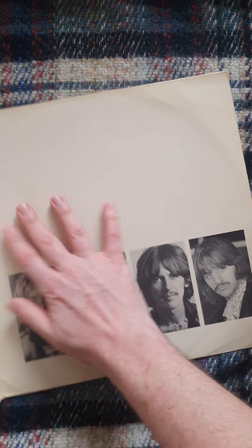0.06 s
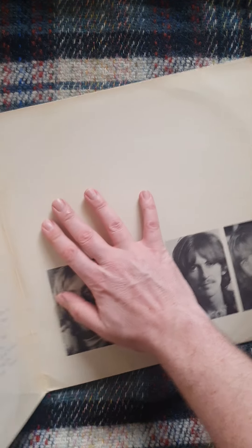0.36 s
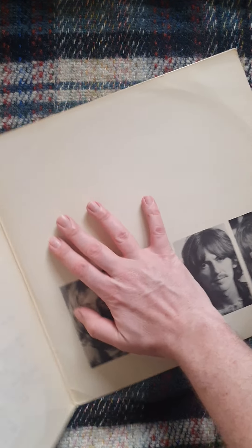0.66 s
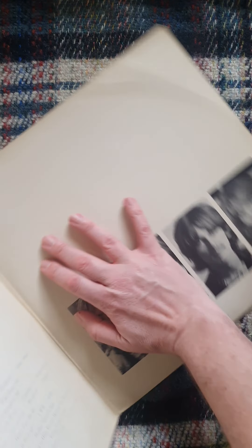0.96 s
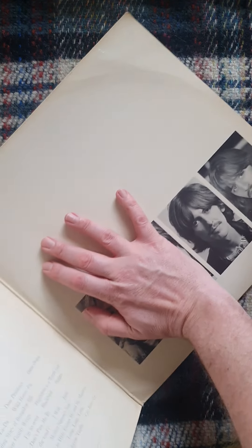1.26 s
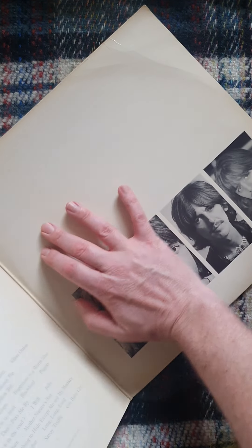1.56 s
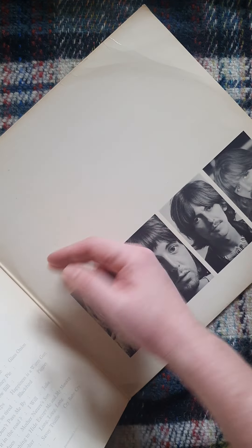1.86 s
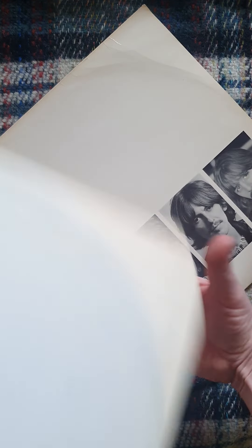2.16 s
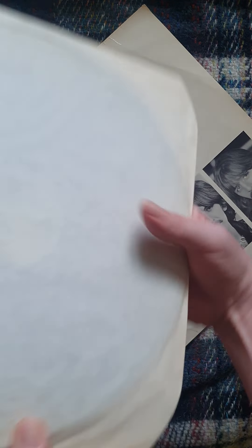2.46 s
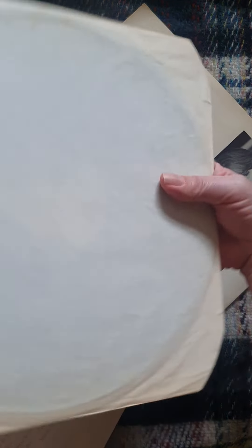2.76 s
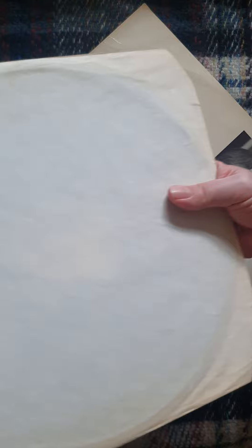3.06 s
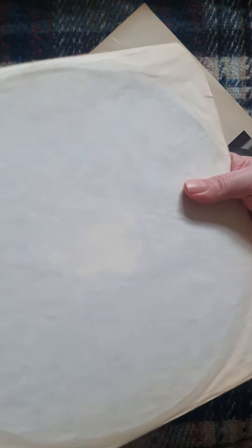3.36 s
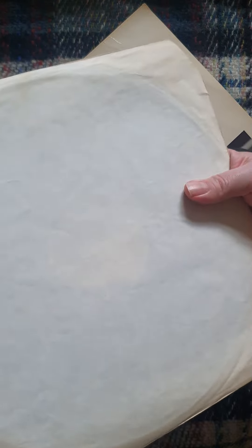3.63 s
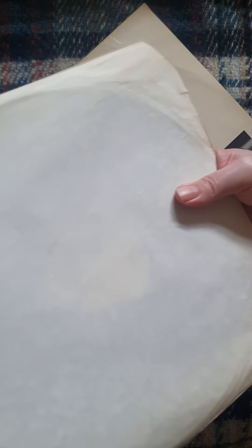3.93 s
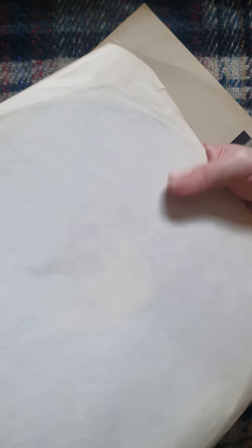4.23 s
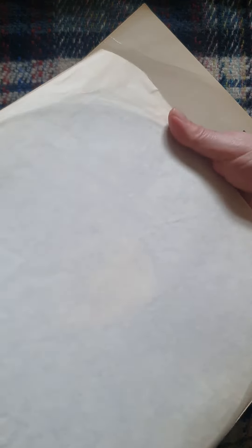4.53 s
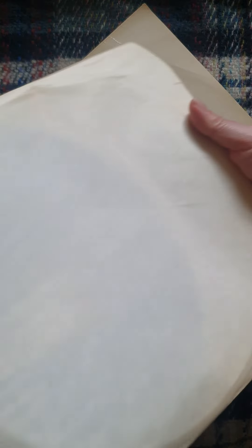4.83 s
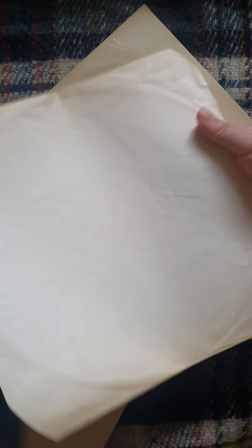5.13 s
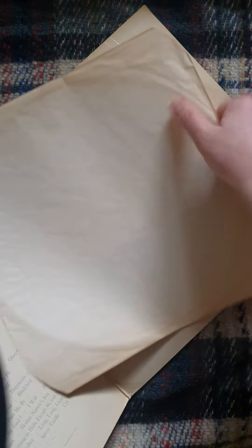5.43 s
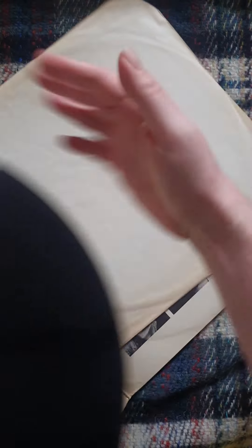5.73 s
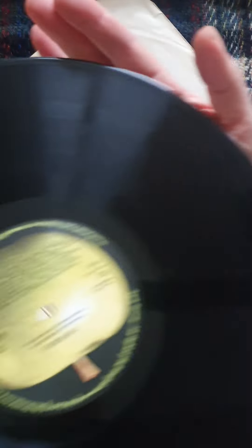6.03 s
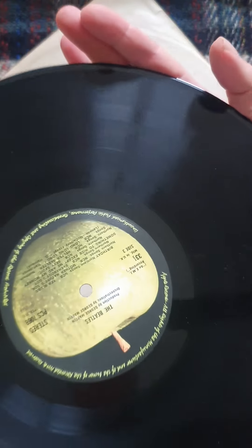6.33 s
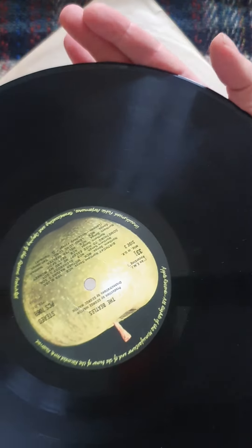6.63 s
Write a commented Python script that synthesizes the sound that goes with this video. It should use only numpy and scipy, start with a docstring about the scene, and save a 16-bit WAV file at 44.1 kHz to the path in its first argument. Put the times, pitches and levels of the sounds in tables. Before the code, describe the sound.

Close, soft cardboard sliding and light clicks, followed by paper crinkling and the swish of a record leaving its sleeve.

```python
"""A paper record sleeve rubs, flexes, crumples and snaps as it is lifted; the vinyl disc slides out.
Rubbing is noise from slipping fibres, coloured by the disc's resonances; the rim swishes and squeaks.
Before that, the cardboard jacket hisses over a wool blanket and is let go with a few light clicks.
A small, quiet room answers the clicks and cracks; partway through, an appliance's mains hum comes up."""
import sys
import numpy as np
from scipy import signal
from scipy.fft import rfft, irfft, next_fast_len
from scipy.io import wavfile
from scipy.ndimage import uniform_filter1d, map_coordinates

SR = 44100
rng = np.random.default_rng(int(sys.argv[2]) if len(sys.argv) > 2 else 0)


def bounce(signal):
    """Save signal as a 16-bit WAV file at the path given by the first command-line argument."""
    frames = np.transpose(np.atleast_2d(signal))
    limited = np.clip(frames, -1, 1)
    pcm = np.round(limited * 32767).astype(np.int16)
    wavfile.write(sys.argv[1], SR, pcm)


N = 303893

# paper on card, vinyl and skin: start_s, rise_s, hold_s, fade_db_per_s, hiss_db, fizz_db, drum_db
SLEEVE_RUBS = [(1.37, 0.018, .14, 280, -55.5, -80.5, -46.5), (1.628, 0.031, .01, 31, -70, -94, -70),
               (2.018, 0.052, 0.011, 155, -60.5, -76, -56), (2.184, 0.085, .02, 112, -66, -78, -65.5),
               (2.422, 0.033, 0.078, 90, -62, -73.5, -59.5), (2.554, 0.058, 0.038, 130, -64, -81, -57.5),
               (2.658, 0.089, 0.091, 71, -66, -89, -70.5), (3.165, 0.021, 0.053, 260, -70.5, -93, -59),
               (3.546, 0.15, .03, 130, -66.5, -87, -50.5), (3.77, 0.13, 0.11, 117.5, -62, -86, -54),
               (4.025, 0.13, 0.06, 200, -54.5, -68.5, -53.5), (4.27, 0.047, .06, 187.5, -53.5, -73, -49.5),
               (4.437, 0.062, 0.018, 105, -66, -83, -49), (4.759, 0.055, .02, 160, -45, -66, -40.5),
               (5.473, 0.064, .01, 170, -70, -74.5, -87), (5.876, 0.042, 0.054, 74, -92, -88, -85),
               (6.06, 0.056, 0.058, 81, -75.5, -87, -75)]
# long pull drawing the disc out: time_s, level_db
DISC_PULL = [(4.56, -68), (4.692, -46.5), (4.71, -50), (4.878, -40), (4.942, -43.5), (5.102, -43),
             (5.282, -60.5), (5.56, -66), (5.62, -98)]
# offsets from the pull level: hiss_db, fizz_db, drum_db
PULL_MIX_DB = [-0.5, -15, -3.5]
# paper snapping through: start_s, level_db, ring_hz, rise_s, knock_db, knock_hz
PAPER_SNAPS = [(4.1588, -17, 4660, 0.00057, -34, 198), (4.161, -16, 2800, 0.0012, -31, 430),
               (4.335, -20.5, 3220, 0.0025, -52, 677), (4.3435, -24, 1695, 0.0035, -28.5, 534),
               (4.3465, -21.5, 3540, .0017, -31.5, 632), (4.683, -29.5, 1643, 0.0024, -51, 444),
               (4.8225, -33, 3220, 0.00049, -29, 590), (5.2809, -40.5, 1150, .0014, -42.5, 454)]
# slower crumples: start_s, level_db, drum_db, rise_s
CRUMPLES = [(1.392, -30.5, -38.5, 0.0047), (1.428, -22.5, -40, 0.0068), (2.497, -43.5, -67, 0.0026),
            (2.538, -45, -44.5, 0.0022), (3.184, -65, -57, 0.0026), (3.603, -76, -46, 0.0028),
            (3.667, -42, -46.5, 0.0067), (3.688, -41, -38.5, 0.0036), (3.858, -42, -52, 0.0052),
            (4.003, -33, -40.5, .003), (4.024, -34.5, -49, 0.0042), (4.089, -33.5, -57.5, 0.011),
            (4.351, -28.5, -37, .01), (4.498, -37.5, -52, 0.0091), (4.814, -26, -34.5, 0.0094),
            (5.269, -32, -40, .0055), (5.344, -32.5, -52, 0.0098)]
# bent sheet slackening: start_s, rise_s, hold_s, taut_hz, slacken_s, level_db
SHEET_BENDS = [(1.39, 0.038, .015, 135.5, 0.31, -43.5), (1.5, 0.027, 0.036, 199.3, .035, -46),
               (2.426, 0.021, 0.0092, 90, 0.055, -50.5), (2.58, 0.036, 0.18, 186, .075, -47.5),
               (3.68, 0.052, 0.16, 272.7, .045, -51.5)]
# rim skimming the sleeve mouth: time_s, centre_hz
RIM_PITCH = [(4.8, 3345), (4.885, 3750), (4.93, 3720), (5.0, 4510), (5.17, 5330), (5.21, 5100),
             (5.27, 4200)]
# rim catching: start_s, rise_s, hold_s, level_db
RIM_SQUEAKS = [(4.863, .015, .012, -42), (5.173, .025, 0.05, -54)]
# jacket pushed over the blanket: start_s, rise_s, hold_s, hiss_db, fizz_db
JACKET_DRAGS = [(0.0, 0.0072, 1.07, -60, -77), (-0.056, 0.21, 0.25, -48.5, -61),
                (0.31, 0.17, 0.14, -52, -60.5), (1.031, 0.15, .13, -45.5, -54.5),
                (1.286, 0.082, 0.075, -47.5, -51.5)]
# fingers and card edges: start_s, level_db, ring_hz, knock_db, knock_hz, pan_db, rebound_db
EDGE_CLICKS = [(1.6015, -28, 2400, -45.5, 442, -1, -24), (1.666, -43, 1650, -42.5, 496, -2.5, -0.5),
               (1.839, -69, 1730, -42, 767, -3, -32), (1.936, -68, 1780, -50, 410, -4, -24),
               (1.997, -37, 2110, -45.5, 480, 1, -15), (2.0758, -24, 1720, -27.5, 361, -2, -1.5),
               (2.134, -32.5, 1920, -32.5, 462, -3, -8.5), (2.1653, -38, 1740, -39.5, 533, -0.5, -9.5),
               (2.446, -50, 1980, -41.5, 470, 1, -20), (3.863, -52, 1480, -35, 399, -1, -22)]
# ringing of card and disc: pitch_ratio, level_db, t60_s
BOARD_MODES = [(.45, -13, 0.057), (.84, -8, 0.031), (1.001, 2, 0.026), (1.22, -4, 0.039),
               (1.65, -10, 0.043), (2.3, -16.5, 0.022)]
# resonances of the sleeved disc: centre_hz, width_hz, lift_db
DISC_MODES = [(451, 95, 6.5), (606.7, 11.3, 5), (800, 34, 0.5), (1090, 32.6, -2), (1566, 24, 5),
              (1680, 19, -18), (1830, 10, -6), (3170, 120, 3)]
# noise spectra: freq_hz, level_db
PAPER_SPECTRUM = [(300, -15.5), (800, -1), (1200, -10), (2000, -5), (2800, -4.5), (3700, -3.5),
                  (5300, -2.5), (6200, -7.5), (7300, -19.5), (10000, -29)]
FIZZ_SPECTRUM = [(6000, -45), (7500, -9), (8700, 0), (11500, -0.5), (15800, -8)]
DRUM_SPECTRUM = [(88, -51), (150, -7), (260, -4), (360, -1), (480, -5), (680, -6), (900, -18.5),
                 (1200, -17.5), (1700, -20.5), (3000, -51.5)]
SNAP_SPECTRUM = [(200, -28), (600, -3), (1100, -6.5), (1600, -8), (3200, -4), (4800, -5.5), (6100, -11),
                 (7500, -22.5), (12000, -24.5), (16000, -36)]
CRUMPLE_SPECTRUM = [(300, -10.5), (750, 5.5), (1300, 5), (1700, 4), (2500, -1.5), (5500, -7.5),
                    (7500, -20.5), (15000, -29)]
WOOL_SPECTRUM = [(88, -31), (150, -10.5), (260, -15.5), (350, -9.5), (587, -8.5), (671, -8), (1540, -5.5),
                 (2220, -5), (2850, -1.5), (4040, -3), (5190, -0.5), (8000, -20), (10400, -54),
                 (17600, -120)]
CLICK_SPECTRUM = [(300, -13), (1200, -1.5), (2700, -4), (3600, -9), (6200, -22.5), (7500, -29),
                  (15000, -40)]
AIR_SPECTRUM = [(20, -2.5), (35, -1), (80, -5), (146, -8.5), (310, -11.5), (640, -23), (1060, -26),
                (2000, -22.5), (2700, -28.5), (3950, -29), (5300, -21.5), (6200, -30.5), (7400, -46),
                (11400, -38), (16000, -47)]
# left-right likeness: freq_hz, correlation
STEREO_LIKENESS = [(100, 0.65), (400, 0.91), (800, 0.5), (1400, 0), (4000, 0.046), (12000, 0)]
# room decay: freq_hz, t60_s
ROOM_DECAY = [(150, 0.39), (1000, 0.26), (4000, 0.2), (12000, 0.15)]
# mains hum partials: pitch_hz, level_db
HUM_PARTIALS = [(100, -68), (199.7, -66.5), (301, -69), (500, -84.5), (700, -80)]


def sleeve():
    """Paper rubs on the disc; the sheets drum along and fan the air."""
    rubs = [np.outer(amp(db), stroke(start_s, rise_s, hold_s, fade_db_per_s))
            for start_s, rise_s, hold_s, fade_db_per_s, *db in SLEEVE_RUBS]
    pull = np.outer(amp(PULL_MIX_DB), amp(curve(DISC_PULL)) * during(DISC_PULL))
    hiss, fizz, drum = power_sum(rubs + [pull])
    hiss = hiss * amp(3.5) * friction(with_disc(PAPER_SPECTRUM), 120, grain_db=-12.5, judder_db=1.8)
    fizz = fizz * amp(5) * friction(FIZZ_SPECTRUM, 344, grain_db=-9, judder_db=2)
    fanning = drum * amp(-16) * resonance(75, width_ratio=0.7)
    drum = drum * amp(-1.5) * friction(with_disc(DRUM_SPECTRUM), 220, grain_db=-2, judder_db=2.25)
    return hiss * pan(2) + fizz * pan(-0.8) + drum * pan(1.09) + fanning


def snaps():
    """Stiff paper buckles: a bright crack, a short ring, a knock of the disc."""
    out, t = np.zeros((2, N)), np.arange(SR // 6) / SR
    spectrum = with_disc(SNAP_SPECTRUM)
    for start_s, level_db, ring_hz, rise_s, knock_db, knock_hz in PAPER_SNAPS:
        ring = np.sin(2 * np.pi * ring_hz * t) * swell(t, rise_s)
        crack = amp(-7.5) * burst(t, rise_s, spectrum) + amp(-10) * ring
        add(out, start_s, amp(level_db) * crack + amp(knock_db) * knock(t, knock_hz, rise_s=0.0023))
    return out * pan(1.3)


def crumples(crease_db=-11.5, quick_rise_s=0.005):
    """Paper crumples against card: one crease gives, three quicker ones follow."""
    out, t = np.zeros((2, N)), np.arange(SR // 5) / SR
    spectrum, drum_spectrum = with_disc(CRUMPLE_SPECTRUM), with_disc(DRUM_SPECTRUM)
    for start_s, level_db, drum_db, rise_s in CRUMPLES:
        scrape = amp(level_db - 17.5) * burst(t, rise_s, spectrum)
        drum = amp(drum_db - 4) * burst(t, rise_s, drum_spectrum)[:1]
        sharpness = min(1, quick_rise_s / rise_s)  # slow crumples give more softly
        crease = amp(level_db + crease_db) * sharpness * burst(t, 0.00087, spectrum)
        add(out, start_s, scrape + drum + crease)
        for delay_s, size_db in zip(rise_s * rng.uniform(0.46, 4, 3), rng.normal(-10.5, 1.3, 3)):
            add(out, start_s + delay_s, amp(level_db + size_db) * burst(t, 0.00049, spectrum))
    return out * pan(0.52)


def bends(slack_hz=65.66, fade_db_per_s=270):
    """A flexed sheet flutters in two modes, falling as it slackens, and pushes a puff of air."""
    out, t = np.zeros(N), np.arange(N) / SR
    for start_s, rise_s, hold_s, taut_hz, slacken_s, level_db in SHEET_BENDS:
        hz = slack_hz + (taut_hz - slack_hz) * np.exp(-np.maximum(t - start_s, 0) / slacken_s)
        upper = amp(-1.5) * (hz / 130) ** 1.55 * resonance(2.5 * hz, width_ratio=1)  # weak when slack
        puff = amp(-2.5) * resonance(80, width_ratio=0.6)
        lower = resonance(hz, width_ratio=0.94)
        out += amp(level_db) * stroke(start_s, rise_s, hold_s, fade_db_per_s) * (lower + upper + puff)
    return from_right([out]) * amp(-2.5)


def rim(swish_db=-5, fade_db_per_s=598):
    """The rim swishes in the sleeve mouth, louder with the pull, and squeaks where it catches."""
    hz = curve(RIM_PITCH)
    skim = amp(curve(DISC_PULL) + swish_db + 2.5 * wobble(30))
    swish = skim * np.array([resonance(hz, width_ratio=0.26) for _ in range(2)])
    catch = power_sum(amp(level_db) * stroke(start_s, rise_s, hold_s, fade_db_per_s)
                      for start_s, rise_s, hold_s, level_db in RIM_SQUEAKS)
    squeak = catch * np.array([resonance(hz, width_ratio=0.06) for _ in range(2)])
    return (swish + squeak) * during(RIM_PITCH) * pan(4.8)


def jacket(fade_db_per_s=196):
    """Card drags over wool, which stops it quickly: fine hiss, faint board rumble."""
    hiss, fizz = power_sum(np.outer(amp(db), stroke(start_s, rise_s, hold_s, fade_db_per_s))
                           for start_s, rise_s, hold_s, *db in JACKET_DRAGS)
    rumble = hiss * amp(-17) * resonance(80, width_ratio=0.7)
    hiss = hiss * amp(3.5) * friction(WOOL_SPECTRUM, 2000, grain_db=-13, judder_db=0.9)
    fizz = fizz * amp(2) * friction(FIZZ_SPECTRUM, 1000, grain_db=-16, judder_db=0.9)
    return hiss * pan(1.9) + fizz * pan(-0.37) + from_right([rumble])


def clicks(rebound_s=0.003, rebound_ratio=1.43):
    """Hard contacts: crack, edge ring, hollow knock. The edge rebounds once and rings higher."""
    out, t = np.zeros((2, N)), np.arange(SR // 6) / SR
    for start_s, level_db, ring_hz, knock_db, knock_hz, pan_db, rebound_db in EDGE_CLICKS:
        for delay_s, ratio, size_db in [(0, 1, 0), (rebound_s, rebound_ratio, rebound_db)]:
            edge = amp(-3.5) * np.sin(2 * np.pi * ring_hz * ratio * t) * swell(t, rise_s=0.00045)
            crack = amp(-9.5) * burst(t, 0.0011, CLICK_SPECTRUM)
            click = amp(level_db) * (edge + crack) + amp(knock_db) * knock(t, knock_hz, rise_s=0.00083)
            add(out, start_s + delay_s, click * amp(size_db) * pan(pan_db))
    return from_right(out)


def room(x):
    """Walls answer after 4 ms; the treble dies first."""
    hz, t, noise = signal.stft(rng.standard_normal((2, SR // 2)), SR, nperseg=256)
    decay = amp(-60 * t / log_interp(ROOM_DECAY, hz)[:, None])
    tail = signal.istft(noise * decay, SR, nperseg=256)[1]
    tail = np.pad(tail / np.linalg.norm(tail[0]), ((0, 0), (SR // 250, 0)))
    echo = signal.fftconvolve(x, tail, axes=1)[:, :N]
    return spread(echo, [(100, 6.5), (400, -3.5), (1000, 3), (5000, 1), (10000, -6)])


def background(idle_db=-18, run_db=5):
    """Room air, a low drone, and an appliance to the right that starts up, hums and stirs the air."""
    t = np.arange(N) / SR
    startup = stroke(start_s=3.524, rise_s=0.15, hold_s=0, fade_db_per_s=3.5)
    running = amp(idle_db) + amp(run_db) * startup
    air = (amp(-67) + amp(-78.5) * running) * unit(spread(rng.standard_normal((2, N)), AIR_SPECTRUM))
    drone = amp(-70) * resonance(71, width_ratio=0.14) + amp(-71) * resonance(102, width_ratio=0.22)
    hum = sum(amp(db + 1.8 * wobble(4)) * np.sqrt(2) * np.sin(2 * np.pi * hz * t + 0.4 * wobble(3.48))
              for hz, db in HUM_PARTIALS)
    return air + from_right([drone * amp(1 + 1.8 * wobble(1.34)) + hum * running])


def friction(spectrum, catches_per_s, grain_db, judder_db):
    """Fibres slip, with sparse stronger catches and an uneven grip; rms 1."""
    catches = (rng.random(N) < catches_per_s / SR) * rng.standard_normal(N) * rng.standard_normal((2, N))
    slips = rng.standard_normal((2, N)) + amp(grain_db) * unit(catches)
    grip = amp(judder_db * unit(wobble(25) + wobble(110)))
    return unit(spread(slips * grip, spectrum))


def knock(t, hz, rise_s):
    """Damped board modes, varied in level and pitch at each hit; peak 1."""
    ring = sum(amp(db + rng.normal(0, 1.44) - 60 * t / t60_s)
               * np.sin(2 * np.pi * hz * ratio * rng.normal(1, 0.045) * t)
               for ratio, db, t60_s in BOARD_MODES)
    ring *= 1 - np.exp(-t / rise_s)
    return ring[None] / np.abs(ring).max()


def burst(t, rise_s, spectrum):
    """A cluster of fibre cracks: noise that swells and dies."""
    return unit(coloured(rng.standard_normal((2, len(t))), spectrum)) * swell(t, rise_s)


def resonance(hz, width_ratio):
    """Noise band around a steady or moving pitch; rms 1."""
    cycles = np.cumsum(np.broadcast_to(hz, N)) / SR
    knots, phase = cycles * width_ratio, 2 * np.pi * cycles
    return unit(wander(knots) * np.cos(phase) + wander(knots) * np.sin(phase))


def with_disc(spectrum):
    """Add the disc's peaks and dips to a spectrum."""
    hz = np.fft.rfftfreq(4096, 1 / SR)
    lift_db = sum(db / (1 + (2 * (hz - centre_hz) / width_hz) ** 2)
                  for centre_hz, width_hz, db in DISC_MODES)
    return np.column_stack([hz, log_interp(spectrum, hz) + lift_db])


def coloured(x, spectrum, size=2048):
    """Minimum-phase filter with the given spectrum."""
    cepstrum = irfft(np.log(amp(log_interp(spectrum, np.fft.rfftfreq(size, 1 / SR)))))
    cepstrum[1:size // 2] *= 2
    cepstrum[size // 2 + 1:] = 0
    impulse = irfft(np.exp(rfft(cepstrum)))
    return signal.fftconvolve(x, impulse[None], axes=1)[:, :x.shape[1]]


def spread(pair, spectrum):
    """Colour two unrelated signals into stereo: alike in the bass, apart in the treble."""
    size = next_fast_len(N + 8192)
    hz = np.fft.rfftfreq(size, 1 / SR)
    angle = np.arccos(np.clip(log_interp(STEREO_LIKENESS, hz), -1, 1)) / 2
    shaped = rfft(pair, size) * amp(log_interp(spectrum, hz))
    mid, side = irfft(shaped * [np.cos(angle), np.sin(angle)], size)[:, :N]
    return np.array([mid + side, mid - side])


def stroke(start_s, rise_s, hold_s, fade_db_per_s):
    """Gain of one movement: rise, hold, fade."""
    t = np.arange(N) / SR - start_s
    return np.clip(t / rise_s, 0, 1) * amp(-fade_db_per_s * np.maximum(t - rise_s - hold_s, 0))


def swell(t, rise_s):
    """Envelope peaking at 1 at rise_s."""
    return t / rise_s * np.exp(1 - t / rise_s)


def curve(rows):
    """(time_s, value) rows, interpolated per sample."""
    return np.interp(np.arange(N) / SR, *np.transpose(rows))


def during(rows):
    """Soft gate over a table's time span."""
    t = np.arange(N) / SR
    return uniform_filter1d(1. * ((t >= rows[0][0]) & (t <= rows[-1][0])), size=600)


def wander(knots):
    """Smooth random curve read at knot positions; rms 1."""
    return unit(map_coordinates(rng.standard_normal(N // 4), [knots], order=3, mode="mirror"))


def wobble(knots_per_s):
    """Smooth random curve at a steady rate."""
    return wander(np.arange(N) * knots_per_s / SR)


def log_interp(points, hz):
    """Read (freq_hz, value) points on a log axis."""
    freq_hz, values = np.transpose(points)
    return np.interp(np.log(hz + 1), np.log(freq_hz + 1), values)


def pan(db):
    """Stereo gains, left over right by db."""
    return amp([[db / 2], [-db / 2]])


def from_right(x, lag_samples=19):
    """Sound from the right reaches the left channel later."""
    return np.array([np.roll(x[0], lag_samples), x[-1]])


def add(track, start_s, sound):
    """Mix a sound in at start_s."""
    part = track[:, max(round(start_s * SR), 0):][:, :sound.shape[1]]
    part += sound[:, :part.shape[1]]


def power_sum(gains):
    """Unrelated noises add in power."""
    return np.sqrt(sum(gain ** 2 for gain in gains))


def amp(db):
    """Decibels to gain."""
    return 10 ** (np.asarray(db) / 20)


def unit(x):
    """Scale to rms 1."""
    return x / np.sqrt(np.mean(x ** 2) + 1e-20)


def scene():
    """Close handling over the background; only clicks and cracks feed the room."""
    taps, cracks = clicks(), snaps() + crumples()
    handling = jacket() + sleeve() + rim() + bends() + taps + cracks
    return handling + room(amp(-9.5) * taps + amp(-8) * cracks) + background()


def record(dry):
    """Brick-wall low-pass."""
    top_hz, size = 15900, next_fast_len(N + 8192)
    return irfft(rfft(dry, size) * (np.fft.rfftfreq(size, 1 / SR) < top_hz), size)[:, :N]


dry = scene()
out = record(dry)
bounce(out)
```